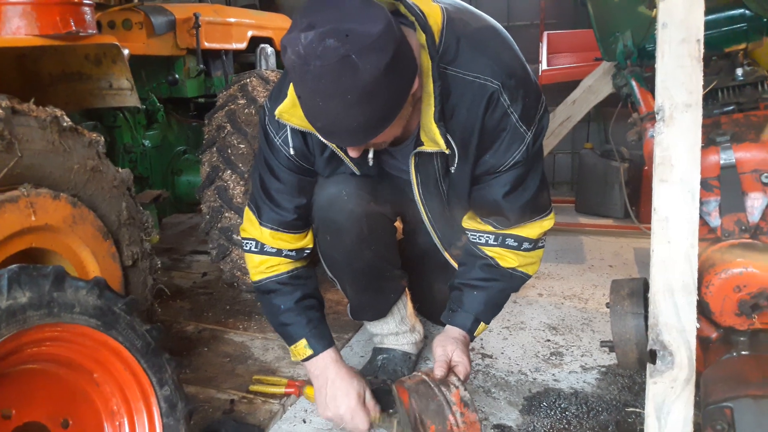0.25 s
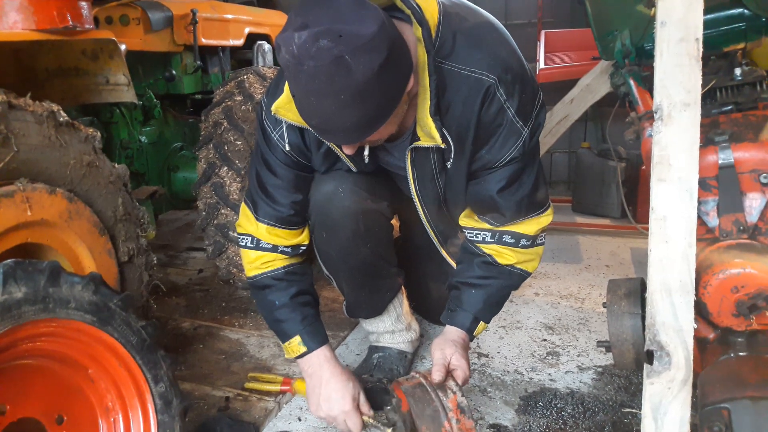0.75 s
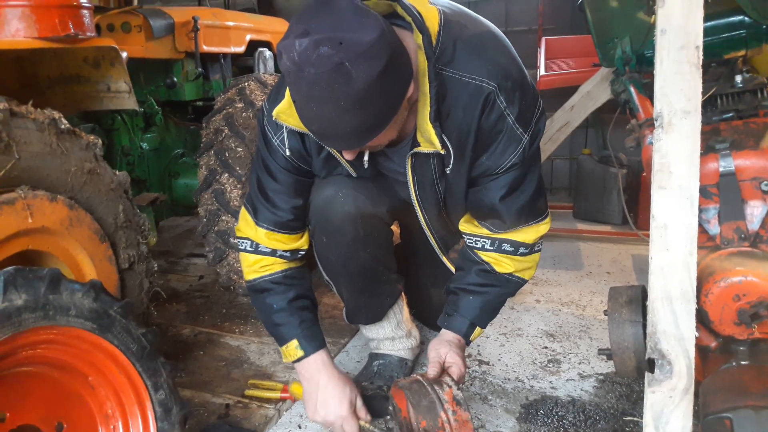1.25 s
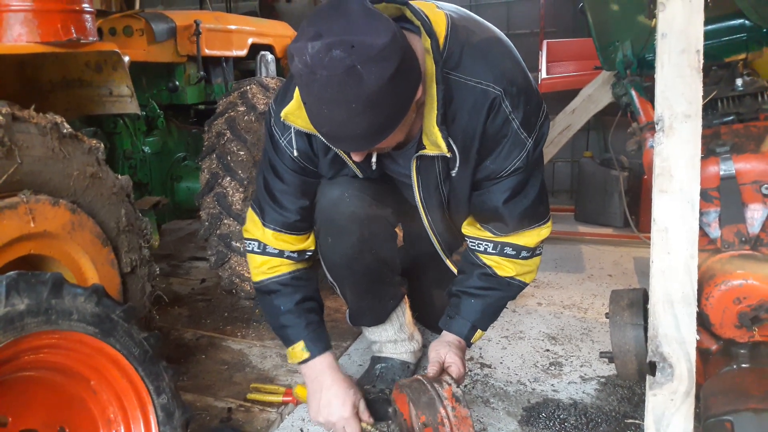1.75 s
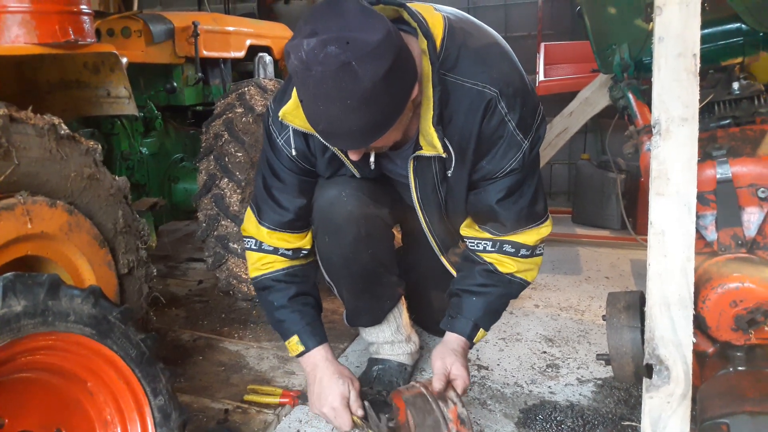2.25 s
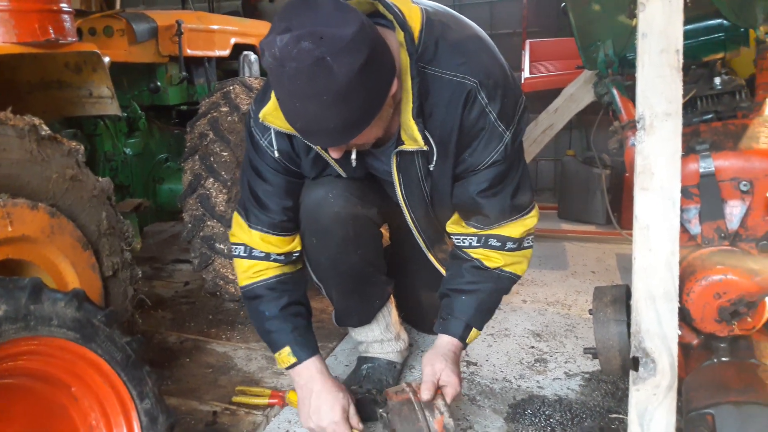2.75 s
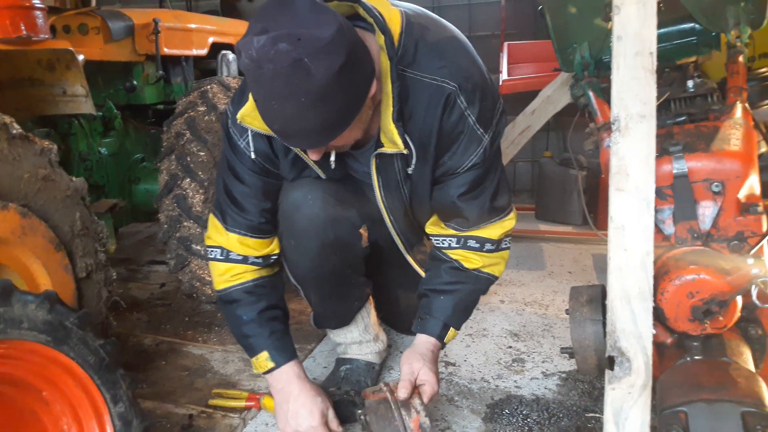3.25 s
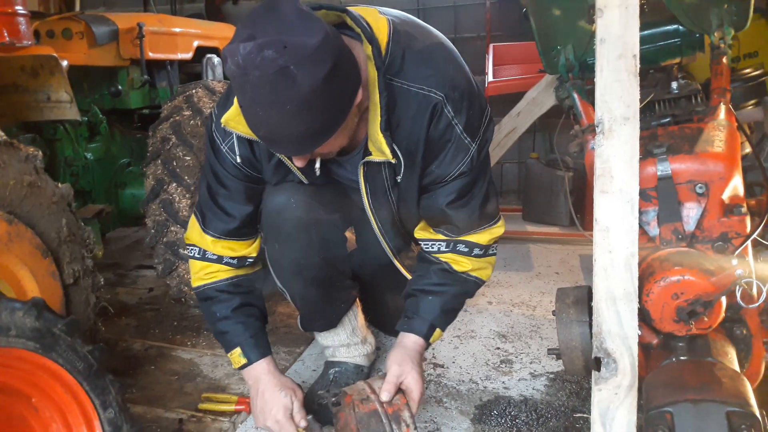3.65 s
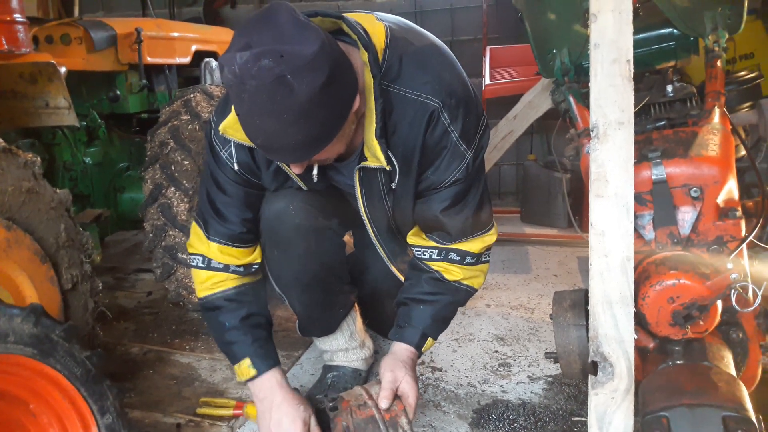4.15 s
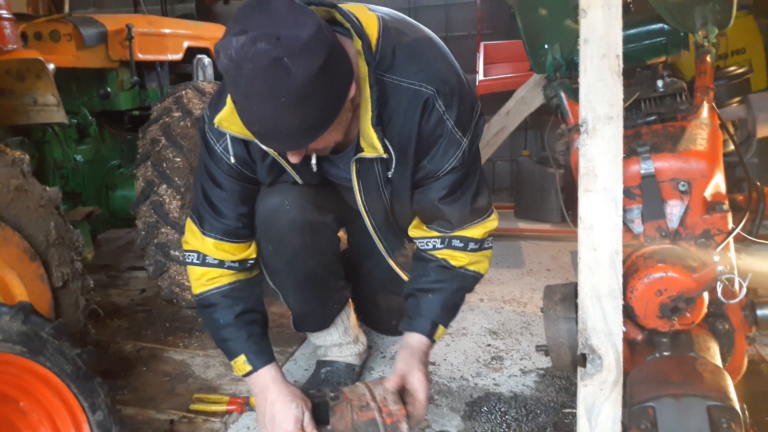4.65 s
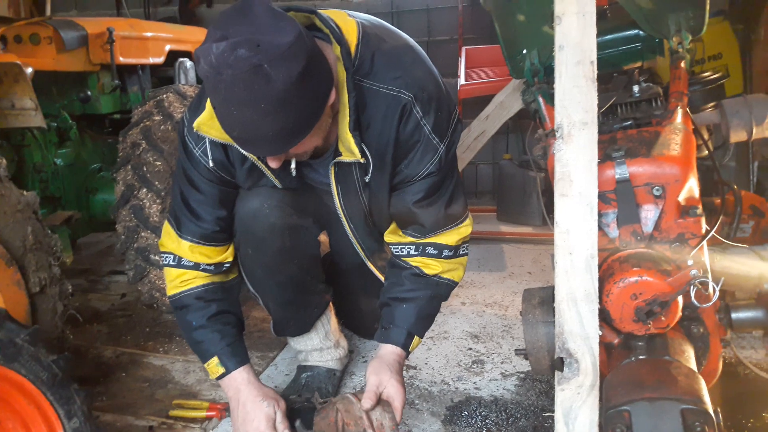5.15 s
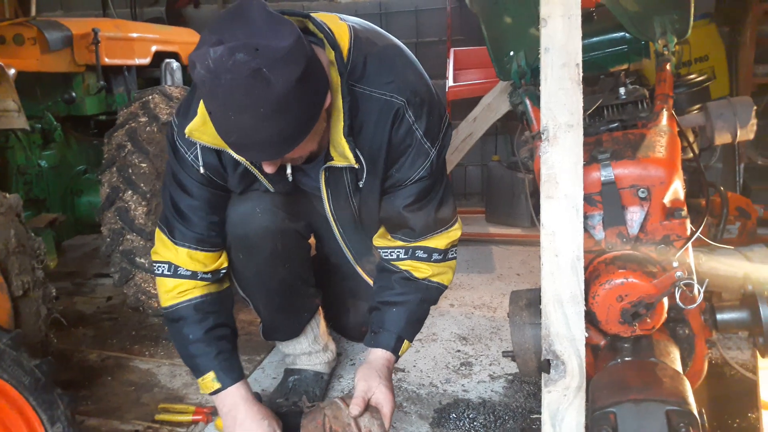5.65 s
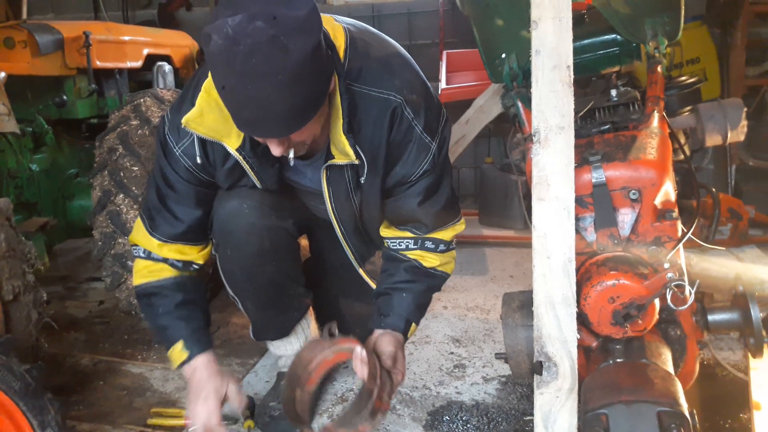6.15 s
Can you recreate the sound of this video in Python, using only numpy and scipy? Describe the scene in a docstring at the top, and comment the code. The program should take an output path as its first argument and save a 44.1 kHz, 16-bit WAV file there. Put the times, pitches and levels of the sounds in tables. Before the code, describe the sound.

Close in a farm workshop, a hammer strikes a small steel drum held on concrete. Ten even, hard clanks, about four a second, stop briefly with a gritty scrape; more uneven blows follow, then a pause with barely audible ticks and two last hits. Finally loose steel clinks and a heavy object clunks down. Short hard room echo, faint air and low hum behind.

```python
"""A small rusty steel drum, held down on a concrete workshop floor, is hammered in short runs.
Each blow sums a noise crack, damped modes of the drum and a resonance of the struck spot; some are followed by
a chattering landing. Between runs the drum shifts with ticks and noisy drags; at the end loose steel
clinks twice and something heavy clunks down, as noise contacts and damped modes.
Convolution with synthetic echoes gives the room; coloured noise and two wavering sines give the air."""
import sys
import numpy as np
from scipy import signal
from scipy.fft import rfft, irfft, next_fast_len
from scipy.io import wavfile
from scipy.ndimage import uniform_filter1d, map_coordinates

SR = 44100
rng = np.random.default_rng(int(sys.argv[2]) if len(sys.argv) > 2 else 0)


def wav_record(signal):
    """Record a signal, one row per channel, as 16-bit PCM in the file named by sys.argv[1]."""
    frames = np.transpose(np.atleast_2d(signal))
    bounded = np.clip(frames, -1, 1)
    # unit amplitude maps onto the largest positive 16-bit level
    quanta = np.round(bounded * 32767).astype(np.int16)
    wavfile.write(sys.argv[1], SR, quanta)


N = 283122  # samples in the scene
T = np.arange(SR // 2) / SR  # time axis of one event or echo, s

# hammer blows: (t/s, relative level/dB, weight/dB, hardness/dB, struck-spot resonance f/Hz, its relative level/dB)
HAMMER_BLOWS = [(-0.062, -20, 3, -3, 1863, -9.5), (0.1778, -24, 1.5, 7, 2087, -3.5),
                (0.4199, -18, 0, 0, 1673, -13.5), (0.662, -19, -1.5, -2, 2470, -4),
                (0.8941, -19.5, 0.5, 1, 2350, -1.5), (1.1355, -23.5, 4, -4, 1313, -17),
                (1.394, -22, 3, 1.5, 1208, -11.5), (1.6365, -20, 1, 1.5, 2494, -12.5),
                (1.8818, -18, -0.5, -0.5, 2306, -8.5), (2.1325, -20, 3.5, -0.5, 2350, -1.5),
                (2.7487, -50, -1, 6.5, 1450, -10.5), (2.798, -21.5, 0, 4, 1896, -3.5),
                (3.0711, -16, -3.5, -1.5, 2073, -4.5), (3.306, -16, -8.5, -2, 2078, -2),
                (3.6269, -32, -0.5, -14.5, 1318, -2.5), (4.041, -22, 1.5, -5, 1354, -15),
                (4.3205, -18, -2.5, -4.5, 1693, -13.5), (4.5624, -19.5, -6, -0.5, 1340, -0.5),
                (5.5265, -24, -0.5, 3, 1852, 5.5), (5.7944, -19.5, -1.5, -2.5, 2080, -2.5)]
# crack of steel on steel, relative spectral density: (f/Hz, level per Hz/dB)
CRACK_SPECTRUM = [(40, -29.5), (100, -22.5), (150, -5), (195, -12.5), (260, -8), (330, -12.5), (600, -0.5),
                  (950, 0.5), (1400, 1), (2000, -2.5), (2900, -5.5), (4500, -13), (6400, -11.5),
                  (8000, -24.5), (15500, -26)]
WORK_PAN_DB = 0.8  # left minus right, added to the lean of the direct sound
# ring over crack at a full blow; lighter taps crack less and ring more
RING_DB, RING_PER_DB, FULL_BLOW_DB = -2.5, 0.47, -21.5
CHOKE_T60, CHOKE_S_PER_DB = 0.025, -0.09  # least decay time at a full blow, s; its change per dB of lightness


def hammering(steady_hz=900):
    """Impact excitation: each blow cracks, rings the drum and the struck spot, and chatters on the concrete."""
    out = np.zeros((2, N))
    # small shifts of the drum change only the short waves of the echo
    long_waves = split(room(), "low", steady_hz)
    for s, db, weight_db, hardness_db, spot_hz, spot_db in HAMMER_BLOWS:
        lightness_db = np.clip(FULL_BLOW_DB - db, 0, 16)
        shift_db = RING_PER_DB * lightness_db / 2
        contact = crack(CRACK_SPECTRUM, t60=0.013, chatter_db=-13.5, chatter_t60=0.1)
        contact = amp(-shift_db) * spot(contact, spot_hz, spot_db)
        least_t60 = CHOKE_T60 + CHOKE_S_PER_DB * lightness_db
        metal = amp(RING_DB + shift_db) * drum_ring(spread_db=2.0, least_t60=least_t60)
        echoes = long_waves + split(room(), "high", steady_hz)
        blow = colour(contact + metal, force(weight_db, hardness_db))
        add(out, s, amp(db - 6.0) * workshop(blow, WORK_PAN_DB, echoes))
    return out


# colour of an average blow: (f/Hz, gain/dB)
AVERAGE_BLOW = [(40, -14.5), (130, 0.5), (600, 0), (1200, -1.84), (1800, 0.3), (3200, 0.6), (5200, -0.1),
                (10000, 1.5)]
WEIGHT_HZ, HARDNESS_HZ = 1410, 4100  # corners of the two slopes


def force(weight_db, hardness_db):
    """Contact force spectrum: a square blow drives the drum into the floor and gains bass, a hard one treble."""
    hz = np.geomspace(40, 16000, 40)
    bass = weight_db * (1 - shelf(hz, WEIGHT_HZ, order=6))
    treble = hardness_db * shelf(hz, HARDNESS_HZ, order=6)
    return np.transpose([hz, along(AVERAGE_BLOW, hz) + bass + treble])


def shelf(hz, corner_hz, order):
    """Shelving weight: rises from 0 below the corner to 1 above it."""
    return 1 / (1 + (corner_hz / hz) ** order)


def crack(spectrum, t60, chatter_db=-40, chatter_t60=.08):
    """High modal density: a hard contact is quickly dying coloured noise, then weaker chatter."""
    envelope = fade(T, t60) + amp(chatter_db) * fade(T, chatter_t60)
    noise = even(rng.standard_normal(len(T)) * envelope, size=15)
    return burst(colour(noise, spectrum))


SPOT_CLANG_DB, SPOT_CLANG_Q = 3, 28  # narrow core of the struck spot's resonance


def spot(x, hz, db, q=9):
    """Local resonance: the struck spot adds a broad peak with a narrow clang at its centre."""
    broad = signal.lfilter(*signal.iirpeak(hz, q, SR), x)
    clang = signal.lfilter(*signal.iirpeak(hz, SPOT_CLANG_Q, SR), x)
    return x + amp(db + 3.5) * (broad + amp(SPOT_CLANG_DB) * clang)


# modes of the drum before choking: (f/Hz, relative level/dB, t60/s)
DRUM_MODES = [(1156, -18, 0.21), (1212, -9, 0.05), (1320, -16, 0.052), (1455, -15.5, 0.11),
              (1617, -14, 0.035), (1716, -9.5, 0.1), (1948, -5, 0.079), (2030, -13.5, 0.19),
              (2247, -15, 0.11), (2415, -22.5, 0.093), (2917, -15.5, 0.36), (3317, -18.5, 0.14),
              (3514, -17.5, 0.12), (3826, -20.5, 0.24), (4590, -26, 0.11), (5490, -25, 0.074),
              (6410, -20, 0.012)]


def drum_ring(spread_db, least_t60=0.02):
    """External damping: hand and floor cap every decay at 0.13 s, unless the least decay time is longer."""
    choked = [(hz, db, max(min(t60, .13), least_t60)) for hz, db, t60 in DRUM_MODES]
    return ring(choked, spread_db)


def ring(modes, spread_db):
    """Modal superposition: damped sines of alternating sign and random strength, their energy independent of t60."""
    hz, db, t60 = np.transpose(modes)[:, :, None]
    sign = (-1) ** np.arange(len(hz))[:, None]
    gain = amp(db + spread_db * rng.standard_normal(hz.shape)) * sign
    equal_energy = np.sqrt(np.log(1000) * .16 / t60)
    return np.sum(gain * equal_energy * fade(T, t60) * np.sin(2 * np.pi * hz * T), 0)


# the drum hops and lands back on the concrete: (t/s, relative level/dB, spot resonance f/Hz)
LANDINGS = [(0.4274, -22, 1740), (.9015, -28.5, 1870), (2.826, -30.5, 1990), (3.338, -29, 2500),
            (3.666, -44, 1560), (3.691, -47.5, 1650), (4.3443, -28.5, 1797), (5.5459, -39, 1764)]
LANDING_RING_DB = -0.5  # setting of the landing spot's resonance


def rebounds():
    """Secondary impact: the drum lands just after some blows; the gentler the landing, the duller."""
    out = np.zeros((2, N))
    for s, db, hz in LANDINGS:
        softness = [(200, -17.5), (700, -5.0), (2000, 1), (5000, 0.28 * (db + 23))]  # (f/Hz, gain/dB)
        contact = spot(crack(CRACK_SPECTRUM, t60=0.029), hz, LANDING_RING_DB)
        landing = contact + drum_ring(spread_db=2)
        add(out, s, amp(db - 8) * workshop(colour(landing, softness), pan_db=0.0, echoes=room()))
    return out


# ticks of the drum shifting on grit: (t/s, relative level/dB)
GRIT_TICKS = [(2.2844, -42.5), (4.9745, -58.5), (5.0579, -53.5), (5.1937, -59.5), (5.3123, -58)]
# colour of a tick: (f/Hz, gain/dB)
TICK_COLOUR = [(2000, -0.5), (5500, 4), (9000, 8.5)]


def shifting():
    """Micro-impacts: grit ticks under the drum, ringing it faintly."""
    out = np.zeros((2, N))
    for s, db in GRIT_TICKS:
        contact = crack(CRACK_SPECTRUM, t60=0.077)
        tick = amp(-3) * (contact + drum_ring(spread_db=3.5, least_t60=0.155))
        add(out, s, amp(db - 18) * workshop(colour(tick, TICK_COLOUR), pan_db=-2.0, echoes=room()))
    return out


# the rim drags over the floor: (start t/s, duration before decay/s, relative level/dB)
RIM_DRAGS = [(2.303, 0.2, -58), (6.085, 0.1, -67.5)]
# friction noise of the rim, relative spectral density: (f/Hz, level per Hz/dB)
RIM_SPECTRUM = [(300, -22), (1100, -12), (1450, -7.5), (1620, 7), (1800, -8), (2200, -8.5), (3000, -23),
                (7000, -31), (10000, -44)]
# the rim bumps softly as it is picked up: (t/s, relative level/dB)
RIM_BUMP = (6.0995, -55)
# contact of the bump and of loose steel, relative spectral density: (f/Hz, level per Hz/dB)
CONTACT_SPECTRUM = [(150, -35), (500, 4.5), (1400, 15.5), (2200, 3), (3200, -4), (4200, -33), (6000, -21),
                    (9000, -51), (15000, -48)]
DRAG_ATTACK_S, DRAG_T60 = 0.044, 0.65  # both in s


def dragging():
    """Friction noise: each drag swells, holds and dies away, roughened by grit; a soft bump joins the last."""
    t = np.arange(N) / SR
    level = np.zeros(N)
    for s, length, db in RIM_DRAGS:
        attack = np.clip((t - s) / DRAG_ATTACK_S, 0, 1)
        level += amp(db) * attack * fade(np.maximum(t - s - length, 0), DRAG_T60)
    grit = amp(1.8 * unit(uniform_filter1d(rng.standard_normal(N), size=500)))
    out = level * unit(colour(diffuse(N) * grit, RIM_SPECTRUM))
    s, db = RIM_BUMP
    bump = crack(CONTACT_SPECTRUM, t60=0.02)
    add(out, s, amp(db - 17) * workshop(bump, pan_db=-6.0, echoes=room()))
    return out


# loose steel clinking: (t/s, relative contact level/dB, relative ring level/dB, added left-right difference/dB)
STEEL_CLINKS = [(6.1924, -46.5, -57.5, 0), (6.2503, -35, -30.5, 3.5)]
# modes of the loose steel: (f/Hz, relative level/dB, t60/s)
STEEL_MODES = [(1324, -9, 0.31), (1730, -3, 0.15), (2896, 6, 0.26), (3280, -13, .2), (3490, -24, 0.15),
               (5320, -24, 0.055), (8716, -37.5, 0.074)]
# the heavy clunk on the floor: (t/s, relative level/dB)
HEAVY_CLUNK = (6.3275, -20.5)
# modes of the heavy object: (f/Hz, relative level/dB, t60/s)
HEAVY_MODES = [(133.7, -14, 0.2), (305, -2.5, 0.066), (417, -9, 0.051), (570, 2, 0.15), (700, -33, .12),
               (920, -3, 0.24), (1028, -1, 0.066), (1136, -5, 0.35), (1480, -15.5, 0.25), (2062, -13, 0.15)]
# thump of the clunk, relative spectral density: (f/Hz, level per Hz/dB)
THUMP_SPECTRUM = [(30, -49), (70, -11), (130, 3.5), (300, -8), (1050, 1), (1500, -2.5), (2100, -8.5),
                  (2700, -23), (5000, -42.5), (8000, -55), (15000, -79)]


def setting_down():
    """Free and massive bodies: loose steel clinks with a clear ring; then a dull, heavy landing."""
    out = np.zeros((2, N))
    for s, contact_db, ring_db, pan_db in STEEL_CLINKS:
        contact = crack(CONTACT_SPECTRUM, t60=0.016)
        add(out, s, amp(contact_db) * workshop(contact, pan_db, amp(0.5) * room()))
        metal = ring(STEEL_MODES, spread_db=0.5)
        add(out, s, amp(ring_db) * workshop(metal, pan_db, amp(-8) * room()))
    s, db = HEAVY_CLUNK
    thump = split(crack(THUMP_SPECTRUM, t60=0.028, chatter_db=-10, chatter_t60=0.3), "high", 102)
    add(out, s, amp(db - 8) * workshop(thump, pan_db=2, echoes=amp(1.5) * room()))
    metal = split(ring(HEAVY_MODES, spread_db=0), "high", 78)
    add(out, s, amp(db - 4) * workshop(metal, pan_db=0.5, echoes=amp(-9) * room()))
    return out


# lean of the direct sound before panning: (f/Hz, left-right difference/dB)
DIRECT_LEAN = [(200, -0.5), (500, -2.5), (1000, -6.5), (2000, -15.5), (4500, 3.5), (8000, -7), (13000, 8)]


def workshop(x, pan_db, echoes):
    """Linear superposition: direct sound plus its convolution with the echoes of the room."""
    direct = np.array([colour(x, [(hz, side * db / 2) for hz, db in DIRECT_LEAN]) for side in (1, -1)])
    wet = signal.fftconvolve(x[None], echoes, axes=1)[:, :len(T)]
    return (direct + wet) * amp([[pan_db / 2], [-pan_db / 2]])


# echoes off nearby machines: (f/Hz, relative gain/dB)
SCATTER_GAIN = [(150, -14.5), (600, -8.5), (2000, 1), (5000, 8), (13000, 1)]
# decay of the diffuse tail: (f/Hz, t60/s)
TAIL_T60 = [(100, 0.27), (300, 0.36), (700, 0.31), (2000, 0.3), (5000, 0.27), (9000, 0.22), (15000, 0.3)]
# colour of the diffuse tail: (f/Hz, relative gain/dB)
TAIL_GAIN = [(60, -9), (150, -2.5), (260, 5.5), (430, 11), (700, -4), (1550, -4), (1950, -7.5),
             (2400, -0.5), (5000, 3), (13000, -6)]
# low resonances of the workshop: (f/Hz, relative level/dB, t60/s)
ROOM_MODES = [(140.5, -3, 0.71), (293, -7, 0.76), (397, 3, 0.25), (521.3, 2.5, 0.18), (650, -1.5, 0.3),
              (728, -8, 0.39)]


def room(near_t60=0.046, build=0.0079):
    """Reverberation: scatter from nearby machines, the diffuse tail and low room modes."""
    near = even(diffuse(len(T)) * fade(T, near_t60) * (T > .0012), size=60)
    near = colour(near / np.linalg.norm(near[0]), SCATTER_GAIN) * amp([[-2], [2]])
    swell = 1 - np.exp(-(T / build) ** 2)
    # each frequency band of the tail decays at its own rate
    hz, t, bands = signal.stft(diffuse(len(T)), SR, nperseg=256)
    decay = fade(t, along(TAIL_T60, hz)[:, None])
    tail = signal.istft(bands * decay, SR, nperseg=256)[1][:, :len(T)]
    tail = even(tail * swell, size=30)
    tail = colour(tail / np.linalg.norm(tail[0]), TAIL_GAIN) * amp([[-1.4], [1.4]])
    boom = ring(ROOM_MODES, spread_db=-7) * swell
    return near + tail + amp(-19) * boom / np.linalg.norm(boom)


# diffuse sound: (f/Hz, left-right correlation)
EAR_CORRELATION = [(100, .93), (300, 0.93), (600, 0.75), (1200, 0.028), (4000, 0.017)]


def diffuse(n):
    """Diffuse field: stereo noise arriving from all sides, most alike in the bass."""
    correlation = along(EAR_CORRELATION, np.fft.rfftfreq(n, 1 / SR))
    turn = np.arccos(np.clip(correlation, -1, 1)) / 2
    mid, side = irfft(rfft(rng.standard_normal((2, n))) * [np.cos(turn), np.sin(turn)], n)
    return np.array([mid + side, mid - side])


# workshop air, relative spectral density: (f/Hz, level per Hz/dB)
AIR_SPECTRUM = [(20, -20), (40, -15.5), (65, 3), (110, -6), (160, -5.5), (260, -12.5), (420, -16),
                (800, -17.5), (1300, -20), (2100, -18.5), (3400, -26), (6500, -30), (8000, -38.5),
                (15500, -41.5)]
# faint hum, mean level before its wavering: (f/Hz, level/dB)
HUM_TONES = [(64.6, -80.5), (425, -75)]


def background():
    """Stationary noise: quiet workshop air with a faint hum, wavering in level and phase."""
    t = np.arange(N) / SR

    def drift():
        """Random modulation: smoothly interpolated noise with eight points per second."""
        return map_coordinates(rng.standard_normal(60), [t * 8])

    hum = np.zeros(N)
    for hz, db in HUM_TONES:
        hum += amp(db + 1.5 * drift()) * np.sin(2 * np.pi * hz * t + .4 * drift())
    return amp(-66.5) * unit(colour(diffuse(N), AIR_SPECTRUM)) + hum


def amp(db):
    """Decibel law: level to amplitude ratio."""
    return 10 ** (np.asarray(db) / 20)


def unit(x):
    """Effective value: scaled to rms 1."""
    return x / np.sqrt(np.mean(x ** 2) + 1e-20)


def burst(x):
    """Energy normalisation: scaled to the energy of 40 ms at rms 1."""
    return x / np.sqrt(np.sum(x ** 2) / (.04 * SR))


def fade(t, t60):
    """Exponential decay: falls by 60 dB in t60 seconds."""
    return np.exp(-np.log(1000) * t / t60)


def along(points, hz):
    """Logarithmic frequency scale: interpolates (f/Hz, value) points."""
    f, v = np.transpose(points)
    return np.interp(np.log(hz + 1), np.log(f + 1), v)


def colour(x, points):
    """Minimum phase: a causal filter whose gain follows (f/Hz, gain/dB) points."""
    m = 2 * next_fast_len(x.shape[-1] // 2 + SR // 10)
    gain = amp(along(points, np.fft.rfftfreq(m, 1 / SR)))
    # folding the cepstrum onto positive times makes the response causal
    cepstrum = irfft(np.log(gain), m)
    cepstrum[1:m // 2] *= 2
    cepstrum[m // 2 + 1:] = 0
    return irfft(rfft(x, m) * np.exp(rfft(cepstrum)), m)[..., :x.shape[-1]]


def even(x, size):
    """Spectral whitening: levels random bass peaks over size bins, leaves the treble ragged, ends at 0.4 s."""
    z = rfft(x)
    power = np.abs(uniform_filter1d(np.abs(z) ** 2, size, axis=-1))
    depth = along([(1500, 1), (5000, 0)], np.fft.rfftfreq(len(T), 1 / SR))
    levelled = z / (power / power.mean() + 1e-4) ** (depth / 2)
    return irfft(levelled, len(T)) * (T < .4)


def split(x, kind, hz):
    """Crossover: keeps the low or the high side."""
    return signal.sosfilt(signal.butter(3, hz, kind, fs=SR, output="sos"), x)


def add(out, s, x):
    """Superposition: mixes x into out from time s on."""
    i = round(s * SR)
    a, b = max(i, 0), min(i + x.shape[-1], N)
    out[:, a:b] += x[:, a - i:b - i]


def scene():
    """Superposition: the drum's sounds, the objects set down and the background."""
    drum = hammering() + rebounds() + shifting() + dragging()
    return drum + setting_down() + background()


TOP_HZ = 15900  # upper band limit


def record(dry):
    """Saturation and band limiting: rounds the highest peaks, then filters steeply above TOP_HZ."""
    rounded = dry / (1 + np.abs(dry / .97) ** 6) ** (1 / 6)
    return signal.sosfilt(signal.cheby1(12, .2, TOP_HZ, fs=SR, output="sos"), rounded)


dry = scene()
out = record(dry)
wav_record(out)
```